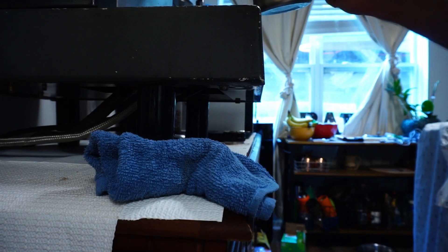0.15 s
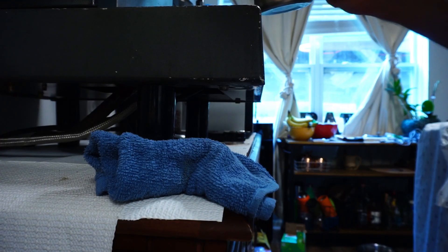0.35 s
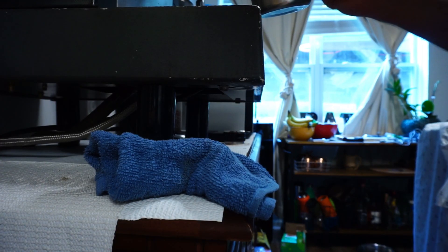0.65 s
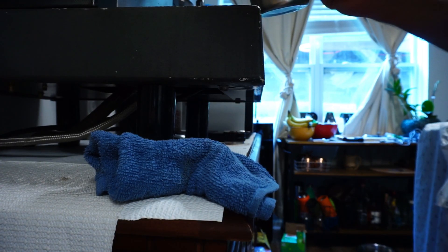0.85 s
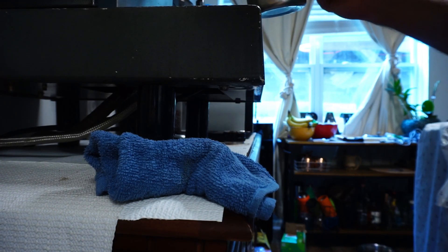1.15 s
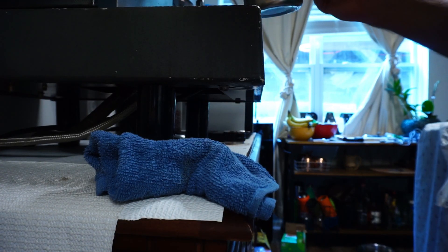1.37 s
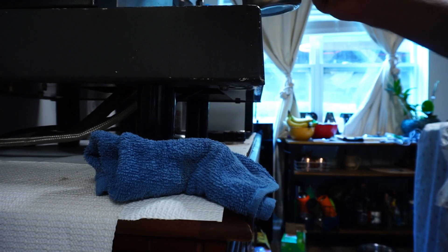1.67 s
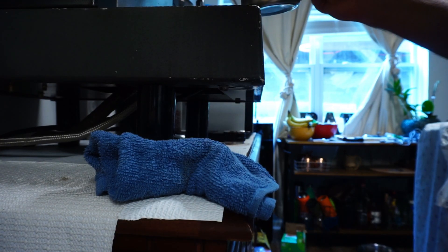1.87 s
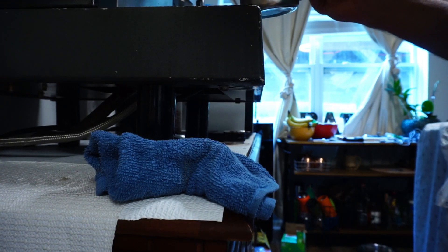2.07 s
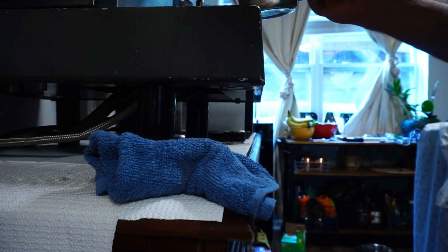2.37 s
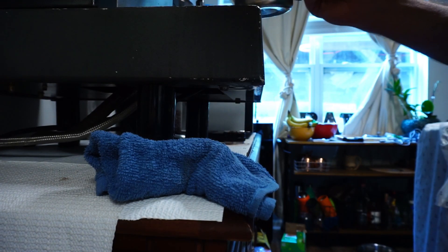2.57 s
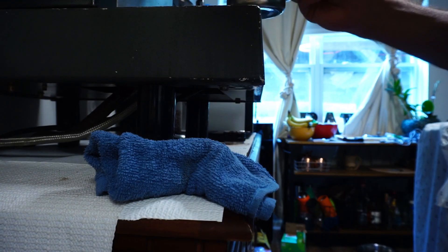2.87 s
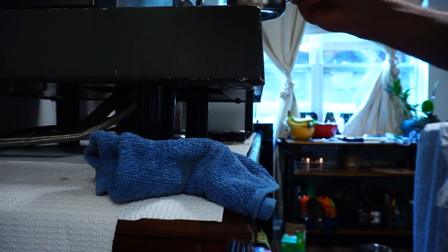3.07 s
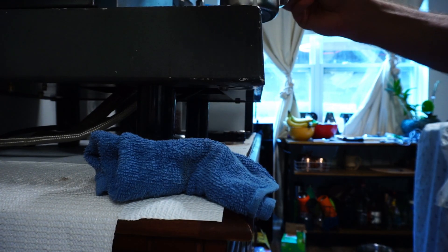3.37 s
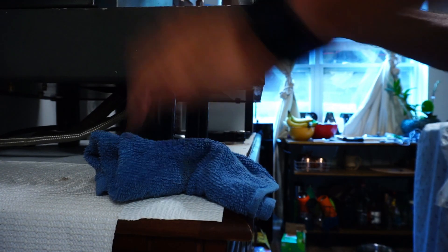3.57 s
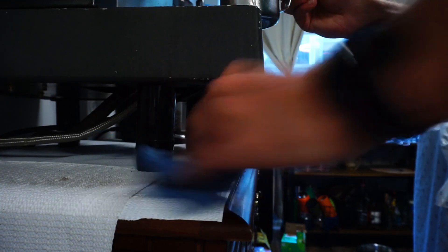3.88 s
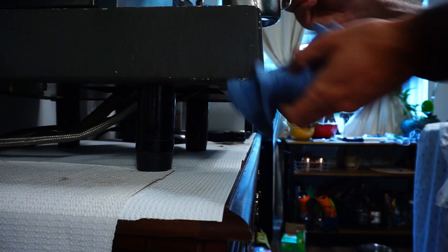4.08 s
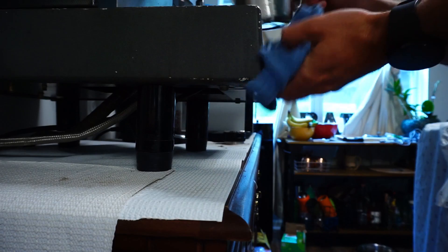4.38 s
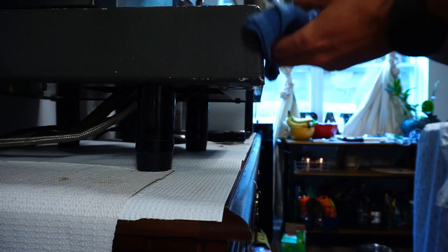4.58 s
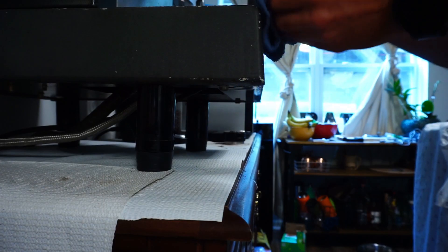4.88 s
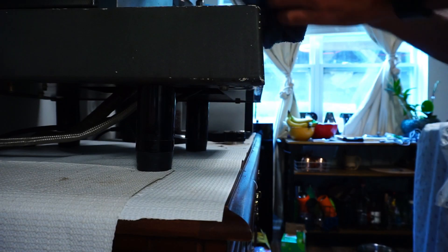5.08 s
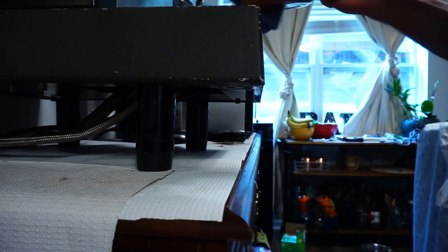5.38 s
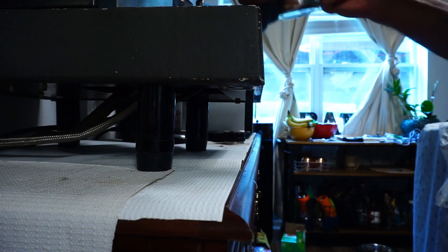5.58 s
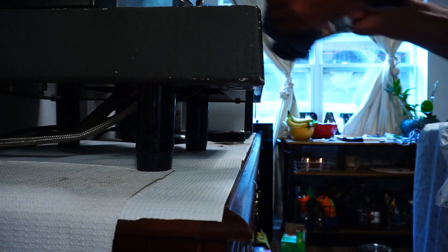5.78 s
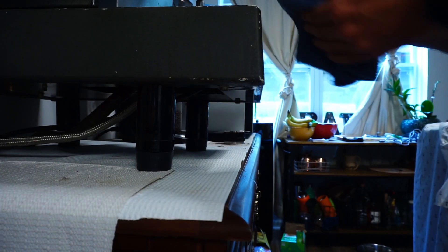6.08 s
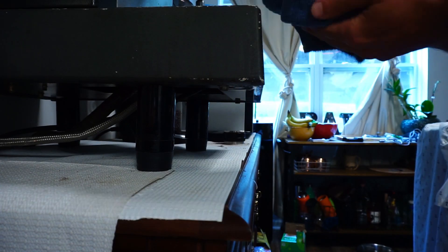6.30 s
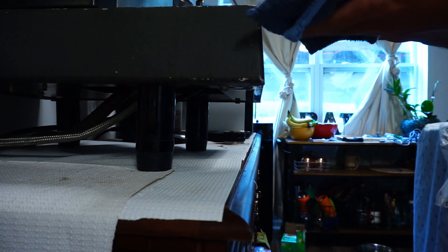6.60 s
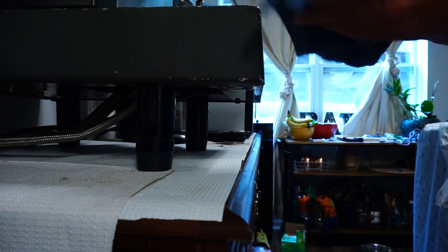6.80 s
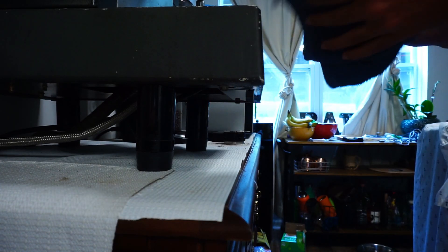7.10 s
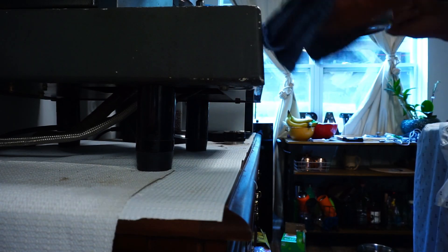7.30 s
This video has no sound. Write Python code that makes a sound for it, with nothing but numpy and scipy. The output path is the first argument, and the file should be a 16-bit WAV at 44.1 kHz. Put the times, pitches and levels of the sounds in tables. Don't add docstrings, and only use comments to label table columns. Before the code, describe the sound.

Heard close up in a small, quiet kitchen. From the start to about 1.4 s, a steam wand spits loud, bright, irregular crackling bursts into milk in a metal pitcher, over dense hiss whose resonances ring the pitcher walls. From 1.4 to 2.2 s it dulls and drops to softer churning and low rumble with faint whistles. Around 2.2 to 2.5 s the froth heaves up again in spurts, then gurgles and soft low thumps lead to last weaker gulps near 3 s. At 3.15 s the valve gives a short high squeal, steam cuts off and residue sighs away. A knob clicks at 3.6 s. Cloth rubs begin about 3.8 s, with knocks and rattles near 3.9-4.0, a strong metal knock at 4.4, a clink at 4.8, and a hard wipe with clustered buzzing knocks at 5.7 s. Afterwards only faint room tone, tiny squeaks at 6.8 and a soft knock and shuffle at 7.2 s.

```python
import sys
import numpy as np
from scipy import signal
from scipy.fft import rfft, irfft, next_fast_len
from scipy.io import wavfile
from scipy.ndimage import uniform_filter1d

SR = 44100
rng = np.random.default_rng(int(sys.argv[2]) if len(sys.argv) > 2 else 0)


def bounce(signal):
    frames = np.transpose(np.atleast_2d(signal))
    limited = np.clip(frames, -1, 1)
    pcm = np.round(limited * 32767).astype(np.int16)
    wavfile.write(sys.argv[1], SR, pcm)


def undo_db(level):
    steps = np.asarray(level, float) / 20
    return 10 ** steps


N = 328545

# [f/Hz, level/dB per Hz]
JET_COLOUR = [(2650, -36), (4500, -13), (7850, -0.5), (8680, -3), (10600, -4.5), (11500, -3), (14000, -5.5),
              (15100, 1), (16000, -18)]
TEAR_COLOUR = [(1180, -60.5), (2000, -28), (2270, -33.5), (2950, 3), (3260, 3.5), (4170, 4.5), (5160, 2),
               (6500, -5), (8450, -20.5), (14300, -120)]
BODY_COLOUR = [(410, -29), (700, -7.5), (1040, -8.5), (1390, -2), (1840, -5.5), (2060, -4), (2280, -7),
               (2650, -6), (3510, -25.5), (5940, -120)]
RUMBLE_COLOUR = [(47, -49.5), (80, -41), (140, -2.5), (210, -3), (330, -0.5), (450, 2), (610, -2),
                 (760, 0.5), (1170, 0.5), (1980, -120)]
# [t/s, level/dB]
JET_FLOW = [(0, -14), (.06, -22), (.15, -17), (.19, -30), (.4, -30), (.5, -30.5), (.54, -21.5), (.62, -20),
            (.8, -23), (.97, -13.5), (1.01, -23), (1.24, -23.5), (1.46, -35.5), (1.62, -42), (2.05, -39),
            (2.55, -36), (3.1, -33.5), (3.17, -47)]
# [t/s, churn level/dB, tip depth as level added to body and rumble/dB]
CHURN = [(0, -27, -4), (.2, -25.5, -4), (.5, -24.5, -7.5), (.8, -23, -6.5), (1.0, -28.5, -4),
         (1.151, -25, -2), (1.4, -25.5, -4), (1.47, -33.5, 1), (1.62, -32.5, 1), (1.79, -43, 2),
         (2.1, -42, -6), (2.3, -45.5, -3.5), (2.56, -36, -2.5), (2.68, -43, 2), (2.82, -35, 0.5),
         (3.05, -34, 2.5), (3.16, -31.5, 5), (3.22, -51.5, 26)]
# [t/s, lift/dB, half width/s, share felt in the body]
SURGES = [(.15, 1, 0.016, 4.7), (.54, 2.5, 0.0084, 1.5), (0.584, -10, 0.0081, 9.2),
          (.63, -5.5, 0.035, 0.67), (.75, 1.5, 0.011, 1.2), (1.11, 0, 0.023, 3), (1.201, 6, 0.018, 1.06),
          (2.109, 0.5, 0.058, 14), (2.25, 17, 0.06, 0.86), (2.41, 7.5, 0.074, 1.96),
          (2.47, -7.5, 0.047, 1.27), (2.51, 7, 0.014, 0.9), (2.97, 5.5, 0.017, 1.4), (3.09, 4, 0.032, 0.41)]
# [f/Hz, width/Hz, lift/dB]
STEAM_MODES = [(1240, 45, 6), (1415, 45, 8), (1575, 30, 6), (1700, 50, 5), (2135, 35, 8), (2760, 150, 4),
               (3310, 160, 2), (3760, 120, 5), (4200, 200, 3), (7760, 45, 4), (8490, 60, 8),
               (9500, 150, 5), (10480, 75, 5), (12550, 300, 5),
               (3040, 110, -10), (7930, 200, -9), (14100, 400, -4), (15690, 150, 12),
               (446.5, 32, 7.5), (600.6, 34, 8.5), (750, 40, -5), (860, 70, 2.5), (1040, 36, -1),
               (1134, 30, 3.5), (1360, 16, -3), (1706, 25, -3.5), (1820, 35, 1.5), (1892, 50, -10),
               (1916, 56, 6.5), (2230, 50, -3.5), (340, 80, -2.5)]
# [t/s, peak level/dB,
# length/s, tilt/dB per octave, loudest f/Hz]
SPURTS = [(.0024, -0.5, 0.028, 4.5, 12200), (0.056, -7.5, 0.077, 7, 12240), (0.103, -12.5, 0.037, 13, 9760),
          (0.14, -5, 0.035, 3, 13300), (.2312, -16, .005, -2.5, 9530), (0.253, -18.5, 0.0082, 2, 13000),
          (0.333, -17, 0.0092, -5, 11320), (0.388, -17.5, 0.008, -7, 9000), (0.409, -9.5, 0.013, 1, 10240),
          (0.449, -5.5, 0.0099, 0.5, 11300), (0.473, -3, .01, 3.5, 13060),
          (0.486, -9.5, 0.011, -2.5, 14300), (0.536, -16, 0.021, 0.5, 8740), (0.5506, 2, 0.034, 4.5, 14000),
          (.594, -2, 0.049, 5.5, 12500), (0.646, -4, 0.036, 5, 12660), (0.755, -9, 0.016, 3.5, 13440),
          (.779, 0, 0.019, 7, 13230), (0.813, -7.5, 0.0076, 4.5, 8000), (0.821, 0, 0.0069, 0, 12200),
          (0.846, -1, 0.018, 6.5, 8960), (0.9157, 1, .007, 4, 12370), (0.921, -1, 0.029, 2, 12380),
          (0.95, -1.5, 0.038, 7.5, 9220), (1.084, -1, 0.016, 6.5, 9600), (1.1, -1, 0.03, 6, 12320),
          (1.194, -10, 0.025, -0.5, 9520), (1.25, -18, .008, -3, 7000), (1.292, -4, .008, -2, 6950),
          (1.313, -4.5, 0.035, 1.5, 9500), (1.372, -12, 0.011, 5.5, 11900),
          (2.2286, -9.5, 0.012, -6.5, 4420), (2.258, -10, .008, -3, 4700), (2.279, -12, .005, 1, 8230),
          (2.292, -4.5, 0.0088, 0, 12430), (2.389, -15, 0.014, -8, 3870),
          (2.939, -13, .016, -4.5, 5400), (2.957, -14.5, .022, -10.5, 6720),
               (2.98, -17, .01, -10, 5970), (3.041, -20, 0.0046, -13.5, 3300),
               (3.105, -15, .012, -10.5, 8800), (3.121, -14.5, .014, -2, 5500),
               (3.142, -13, 0.021, -12.5, 2700), (3.176, -22, .008, -17, 1700)]
# [t/s, peak level/dB, length/s, loudest f/Hz]
SLURPS = [(1.1745, -15, 0.032, 4250), (1.297, -14, 0.01, 3830), (1.343, -10.5, 0.0078, 4100),
          (1.381, -13.5, .01, 3860), (1.396, -19, 0.0096, 3300), (1.416, -15.5, 0.011, 4070),
          (1.517, -24.5, 0.0068, 3740), (1.555, -33, .006, 3810), (1.567, -19, 0.0077, 3790),
          (1.599, -29.5, 0.0075, 2300), (1.65, -35, 0.011, 3730), (1.697, -25, .01, 4120),
          (2.423, -19.5, 0.0098, 3750), (2.472, -19.5, 0.012, 3300), (2.495, -18.5, 0.012, 3400),
          (2.778, -21, 0.016, 4000), (0.28, -22.5, .012, 4000), (0.414, -18.5, 0.0068, 4400),
          (0.681, -16.5, 0.016, 4000), (0.741, -15, 0.017, 3710), (1.201, -13, .004, 3300),
          (1.21, -14, 0.0036, 3600), (1.26, -19, 0.0045, 3900), (1.726, -27.5, 0.0046, 6470)]
# [f/Hz, level/dB per Hz]
SPURT_COLOUR = [(100, -110), (1500, -34), (3000, -11.5), (4200, -12), (6000, -7.5), (9500, -4.5),
                (12500, -8), (15500, -5.5), (16000, -15.5)]
# [f/Hz, level/dB, t60/s]
SQUEAL_MODES = [(3250, -20, .15), (3310, -23, .15), (6530, -30, .13), (9750, -31, .11), (2650, -29, .07),
                (3265, -38, .45), (3320, -43, .4), (6540, -52, .3)]
# [start t/s, end t/s, f/Hz, width/Hz,
# level/dB]
FUZZY_TONES = [(1.4, 3.2, 8500, 200, -52.5), (1.4, 3.2, 11300, 550, -50.5), (1.4, 3.2, 15000, 600, -53),
               (2.55, 3.1, 4820, 300, -44), (1.75, 2.65, 3280, 200, -52), (2.4, 3.3, 1500, 450, -43),
               (2.7, 3.2, 6570, 150, -50), (.1, .2, 7770, 150, -32), (.02, .2, 250, 90, -45),
               (3.2, 3.55, 170, 90, -55), (2.82, 3.0, 4820, 200, -43),
               (0.17, 0.52, 1100, 720, -39), (0.81, 1, 450, 200, -46), (2.06, 2.16, 380, 190, -48),
           (2.3, 2.45, 330, 54, -53), (2.72, 2.84, 190, 79, -54), (2.15, 2.4, 120, 100, -57.5),
           (3.08, 3.3, 1650, 350, -41), (3.55, 3.75, 140, 110, -56.5), (1.8, 2, 1200, 300, -48),
           (3.25, 3.5, 250, 110, -55), (.85, 1.1, 200, 80, -58), (2.55, 3, 306, 82, -54)]
# [t/s, peak level/dB, length/s]
THUMPS = [(.72, -47, 0.087), (1.15, -49, 0.089), (1.27, -43, .1), (1.34, -43, 0.061), (1.41, -48, 0.26),
          (2.09, -56, 0.054), (2.49, -40, 0.062), (2.955, -40, 0.055), (3.06, -39, 0.089),
          (3.295, -36.5, 0.067), (3.35, -38, 0.06), (3.475, -44.5, 0.067)]
# [t/s, peak level/dB, main f/Hz, rattle level/dB, counter boom level/dB]
KNOCKS = [(3.922, -34, 670, 6.5, -1), (3.94, -34.5, 404, -8.5, -21), (3.981, -38.5, 408, -8.5, -15.5),
          (4.037, -40, 860, 10, 2), (4.414, -19, 672, -2, -34), (4.429, -24.5, 398, 0, -17),
          (4.7633, -34.5, 706, 6.5, -4.5), (5.239, -49, 368, 7, -6), (5.535, -43.5, 740, 5, -4),
          (5.563, -49, 636, 5, -15), (5.599, -54, 610, 13, -15), (5.6921, -20.5, 1525, -11.5, -24.5),
          (5.704, -21.5, 1557, -10, -23), (5.731, -28, 1400, -2.5, -16), (5.771, -25.5, 700, -7.5, -13),
          (5.786, -40.5, 759, -10, 0), (7.199, -39.5, 382, -4, -8)]
# [f/Hz, level/dB per Hz]
RATTLE_COLOUR = [(71, -37), (120, 2.5), (412, -3), (711, -4), (971, -11.5), (1100, -7.5), (1290, -9),
                 (1580, -17), (1790, -21), (5000, -28), (6500, -60), (11000, -120)]
BOOM_COLOUR = [(110, -29.5), (160, -8.5), (240, 4.5), (290, 0), (400, -13), (650, -16.5), (1000, -42)]
# [t/s, peak level/dB]
CRACK = (6700, 0.044, 2.9)
CRACKS = [(3.925, -47), (4.0378, -33.5), (4.051, -37.5), (4.413, -36.5), (4.765, -32), (5.694, -42),
          (5.7697, -30), (5.8148, -41.5)]
PING = (1900, 0.14, 33)
PINGS = [(3.924, -45), (4.037, -40.5), (4.4134, -41.5), (4.43, -56), (5.5618, -48.5), (5.6007, -47.5),
         (5.692, -37.5), (5.718, -44.5)]
SCRAPE = (4200, 0.24, 32)
SCRAPES = [(5.7135, -39.5), (5.7394, -52), (5.77, -45)]
SWISH = (11000, 0.093, 8.9)
SWISHES = [(4.439, -41), (4.7646, -69), (5.2594, -50), (5.3248, -47), (5.7194, -44)]
SQUEAK = (3700, 0.097, 61)
SQUEAKS = [(6.8129, -48), (6.8294, -50), (6.8594, -55)]
SHUFFLE = (490, 0.18, 13)
SHUFFLES = [(7.23, -43.5), (7.327, -47.5)]
# [t/s, peak level/dB, centre f/Hz, t60/s, narrowness/dB per octave squared]
ODD_TICKS = [
    (3.5748, -40, 9000, 0.006, 4),
    (3.79, -49, 7500, 0.027, 3),
    (4.4945, -37, 2980, 0.037, 15),
    (4.766, -42, 235, 0.86, 150),
    (5.772, -38, 280, 0.46, 58),
    (5.745, -42, 273, .3, 60),
]
VENT = [
    (3.19, -33.5, 1400, 0.58, 8.5),
    (3.175, -38, 7500, .4, 4),
]
# [t/s, peak level/dB, centre f/Hz, t60/s]
BUZZES = [(3.926, -37.5, 394, 0.2), (3.926, -36.5, 730, 0.11), (4.04, -45, 1750, 0.13),
          (4.416, -35, 1170, .2), (4.44, -32, 410, 0.27), (4.43, -35, 687, 0.22), (4.418, -43, 1900, .18),
          (4.418, -45, 2350, .15), (4.495, -44, 1580, .05), (5.716, -34, 1550, 0.13),
          (5.695, -35, 2270, 0.18), (5.72, -35.5, 800, .2), (5.735, -35, 1384, 0.23),
          (5.745, -39.5, 1640, .25), (5.772, -29.5, 663, 0.091), (5.79, -41.5, 1554, 0.18),
          (5.535, -46, 1350, .05), (5.56, -44, 1450, .15)]
# [t/s, f/Hz, level/dB, t60/s]
KNOB_SNAP = (3.5748, 7200, -27, .004)
# [f/Hz, level/dB, t60/s]
CLINK_MODES = [(1475, -45, .09), (1500, -50, .12), (3450, -43, .045), (4565, -42, .02), (5512, -44, .025),
               (6800, -41, .015), (7950, -47, .015)]
# [peak t/s, level/dB, fade/dB per s]
WIPES = [
    (3.84, -53, 4.5),
    (3.94, -50.5, 70),
    (4.06, -52, 32),
    (4.46, -47.5, 20),
    (4.8, -51.5, 30),
    (5.3, -55, 37),
    (5.55, -50.5, 48),
    (5.711, -38.5, 79),
    (5.9, -55.5, 25),
    (7.22, -64, 24.5),
]
# [f/Hz, level/dB per Hz]
CLOTH_COLOUR = [(350, -53), (600, 1.5), (1070, -4), (1330, -5), (2270, -11.5), (3830, -14.5),
                (10000, -10.5), (16000, -9)]
# [f/Hz, level/dB per Hz]
ROOM_COLOUR = [(12, -40.5), (20, -13), (65, -7), (187, -8), (228, -8.5), (301, -8.5), (471, -10),
               (573, -17.5), (737, -13), (1220, -18), (1610, -19), (2590, -22), (16000, -30.5)]
# [f/Hz, likeness]
ROOM_LIKENESS = [(60, .9), (130, .75), (290, .25), (640, -.2), (1410, -.3), (3100, -.2), (7300, -.1),
                 (7700, .95), (16000, .96)]
# [f/Hz, level/dB]
FRIDGE_HUM = [(59, -63), (475, -66)]
# [f/Hz, t60/s]
KITCHEN_T60 = [(200, 0.8), (1000, 0.32), (4000, 0.29), (12000, 0.19)]
# [f/Hz, phase/rad]
LEFT_LEADS = [(100, 0.61), (900, -1.21), (4300, -0.61), (6500, -1.25), (7800, 0), (16000, 0.19)]
# [f/Hz, level/dB]
PORT_WIDTH = [(60, -10), (300, -8), (1000, -11.5), (6000, 1), (9000, 2.5), (16000, 0.5)]
# [f/Hz, side over mid level/dB]
NARROW_UNDER = [(2200, -60), (2300, -11), (4400, -11), (4500, -22), (7400, -20), (7600, -8), (16000, -8)]


def evened(x):
    return x / np.sqrt(np.mean(x ** 2) + 1e-20)


def read(points, hz):
    f, value = np.transpose(points)
    return np.interp(np.log(hz + 1), np.log(f + 1), value)


def add(mix, s, sound):
    part = mix[max(round(s * SR), 0):][:len(sound)]
    part += sound[:len(part)]


def colour(x, db_of):
    return irfft(rfft(x) * undo_db(db_of(np.fft.rfftfreq(len(x), 1 / SR))), len(x))


def spit(size, grain_s, depth_db):
    grain = max(int(grain_s * SR), 1)
    jumps = evened(uniform_filter1d(rng.standard_normal(size), grain))
    return evened(rng.standard_normal(size) * undo_db(depth_db * jumps))


def patchy(x, depth_db):
    z = signal.stft(x, nperseg=512)[2]
    patches = uniform_filter1d(rng.standard_normal(z.shape), size=6, axis=0)
    patches = evened(uniform_filter1d(patches, size=8, axis=1))
    return evened(signal.istft(z * undo_db(depth_db * patches), nperseg=512)[1][:len(x)])


def walls(hz):
    modes = STEAM_MODES
    return sum(db / (1 + (2 * (hz - mode_hz) / width) ** 2) for mode_hz, width, db in modes)


def ring(hz, db, t60, t):
    return undo_db(db - 60 * t / t60) * np.sin(2 * np.pi * hz * t)


def steam():
    t, out = np.arange(N) / SR, np.zeros(N)
    s, churn_db, depth_db = np.transpose(CHURN)
    churn_db, depth_db = np.interp(t, s, churn_db), np.interp(t, s, depth_db)
    tear_db, body_db = churn_db.copy(), churn_db.copy()
    for at, lift_db, half_s, share in SURGES:
        heave_db = lift_db * np.maximum(1 - abs(t - at) / (2 * half_s), 0)
        tear_db += heave_db
        body_db += heave_db * share

    shut_s, drop_db, drain_db_per_s = 3.192, 14, 59
    since = t - shut_s
    shut_db = (since > 0) * (drop_db * np.minimum(since / 0.0092, 1) + drain_db_per_s * since)

    jet_db = np.interp(t, *np.transpose(JET_FLOW))
    rumble_db = -22 + 0.58 * (0.78 * churn_db + 0.28 * body_db) + 0.94 * depth_db
    layers = [  # colour, level dB, grain s, grain dB, patch dB
        (JET_COLOUR, jet_db - .5 * shut_db, .003, 2.4, 2.),
        (TEAR_COLOUR, tear_db - .5 * shut_db, .004, 2.6, 1.1),
        (BODY_COLOUR, body_db + depth_db - 1.3 * shut_db, .008, 1.8, 1.3),
        (RUMBLE_COLOUR, rumble_db - 0.92 * shut_db, .02, 1.8, 1.3)]
    for shape, level_db, grain_s, grain_db, patch_db in layers:
        hiss = colour(spit(N, grain_s, grain_db), lambda hz: read(shape, hz) + walls(hz))
        out += patchy(hiss, patch_db) * undo_db(level_db - 3.0)
    return out


def spurts():
    out, t = np.zeros(N), np.arange(8192) / SR
    slurp_tilt_db, focus_db, focus_octaves = -11, 7.5, 0.17
    slurps = [(s, db, length, slurp_tilt_db, hz) for s, db, length, hz in SLURPS]
    for s, db, length, tilt_db, hz in SPURTS + slurps:
        def gulp_db(f):
            tilt = np.clip(tilt_db, -15, 12) * np.log2((f + 500) / 9000)
            focus = focus_db * np.exp(-(np.log2((f + 1) / hz) / focus_octaves) ** 2)
            return read(SPURT_COLOUR, f) + 0.333 * walls(f) + tilt + focus

        burst = patchy(colour(spit(len(t), 0.0012, 1.85), gulp_db), 3.44)
        fall_s = 0.0073 + 0.16 * length
        shape = np.minimum(t / 0.0015, 1) * np.exp(-np.maximum(t - length, 0) / fall_s)
        add(out, s, undo_db(db - 13.0) * burst * shape)
    return out


def valve_squeal():
    out, t = np.zeros(N), np.arange(20000) / SR
    rise_s = .005
    add(out, 3.143, sum(ring(*mode, t) for mode in SQUEAL_MODES) * np.minimum(t / rise_s, 1))
    return out


def resonate(x, hz, width):
    return evened(colour(x, lambda f: -20 * np.log10(1 + (2 * (f - hz) / width) ** 2)))


def whistles():
    out = np.zeros(N)
    for start, end, hz, width, db in FUZZY_TONES:
        size = 256 * int((end - start) * SR / 256)
        tone = resonate(spit(SR * 2, .03, 1.8), hz, width)[:size]
        add(out, start, undo_db(db) * tone * signal.windows.tukey(size, .45))
    return out


def thumps():
    out = np.zeros(N)
    start_hz, sag = 165, .2
    for s, db, length in THUMPS:
        t = np.arange(0, length, 1 / SR)
        swell = np.sin(np.pi * t / length) ** 2
        add(out, s, undo_db(db) * swell * np.sin(2 * np.pi * start_hz * t * (1 - sag * t / length / 2)))
    return out


def knocks():
    out, t = np.zeros(N), np.arange(16000) / SR
    boom_t60_s, boom_rise_s, rise_s = 0.5, 0.0041, .0013
    for s, db, hz, rattle_db, boom_db in KNOCKS:
        t60 = 0.087 * (700 / hz) ** .45
        note = ring(hz * .985, -7, t60, t) + ring(hz * 1.03, -8.5, 0.98 * t60, t)
        rattle = evened(colour(rng.standard_normal(len(t)), lambda f: read(RATTLE_COLOUR, f)))
        rattle *= undo_db(rattle_db - 11.5 - 45 * t / t60)
        boom = evened(colour(rng.standard_normal(len(t)), lambda f: read(BOOM_COLOUR, f)))
        boom *= undo_db(boom_db - 8.5 - 60 * t / boom_t60_s) * np.minimum(t / boom_rise_s, 1)
        add(out, s, undo_db(db) * (note + rattle + boom) * np.minimum(t / rise_s, 1))
    return out


def ticks():
    out, t = np.zeros(N), np.arange(16000) / SR
    kinds = [(CRACK, CRACKS), (PING, PINGS), (SCRAPE, SCRAPES),
             (SWISH, SWISHES), (SQUEAK, SQUEAKS), (SHUFFLE, SHUFFLES)]
    events = ODD_TICKS + VENT
    events = events + [(*row, 220) for row in BUZZES]
    events = events + [(*row, *kind) for kind, rows in kinds for row in rows]
    for s, db, hz, t60, narrow_db in events:
        noise = rng.standard_normal(len(t))
        tick = evened(colour(noise, lambda f: -max(narrow_db, 1) * np.log2((f + 1) / hz) ** 2))
        add(out, s, tick * undo_db(db - 60 * t / t60 - 60 * min(t60, .1)))
    add(out, KNOB_SNAP[0], ring(*KNOB_SNAP[1:], t))
    add(out, 4.7638, sum(ring(*mode, t) for mode in CLINK_MODES))
    return out


def cloth():
    t = np.arange(N) / SR
    rise_db_per_s, held_db, pickup_s = 384, -61, 3.5
    strokes = [db - np.maximum(rise_db_per_s * (s - t), fade_db * (t - s)) for s, db, fade_db in WIPES]
    rub = patchy(colour(spit(N, 0.012, 1.7), lambda hz: read(CLOTH_COLOUR, hz)), 0.73)
    held = undo_db(held_db) * np.clip((t - pickup_s) / 0.28, 0, 1)
    return rub * np.maximum(undo_db(np.max(strokes, axis=0)), held)


def kitchen(x):
    taps = np.zeros((2, 22050))
    at = np.arange(100, 22000, 20) + rng.integers(0, 20, (2, 1095))
    np.put_along_axis(taps, at, rng.choice([-1., 1.], at.shape), 1)
    hz, t, z = signal.stft(taps, SR, nperseg=256)
    decay = undo_db(-60 * t / read(KITCHEN_T60, hz)[:, None])
    tail = signal.istft(z * decay, SR, nperseg=256)[1]
    return signal.fftconvolve(x[None], tail / np.linalg.norm(tail[0]), axes=1)[:, :N]


def placed(x, left_db, wet_db):
    size = next_fast_len(N + 8192)
    lead = np.exp(1j * read(LEFT_LEADS, np.fft.rfftfreq(size, 1 / SR)))
    left = irfft(rfft(x, size) * lead, size)[:N]
    wet = undo_db(wet_db) * kitchen(x)
    mid = wet.mean(0)
    side = np.pad(wet[0] - wet[1], (0, size - N)) / 2
    side = colour(side, lambda hz: read(PORT_WIDTH, hz))[:N]
    return (np.array([left, x]) + [mid + side, mid - side]) * undo_db([[left_db / 2], [-left_db / 2]])


def room_tone():
    hz, t = np.fft.rfftfreq(N, 1 / SR), np.arange(N) / SR
    same = np.clip(read(ROOM_LIKENESS, hz), -.99, .99)
    a, b = rfft(rng.standard_normal((2, N)))
    pair = np.array([a, same * a + np.sqrt(1 - same ** 2) * b])
    air = evened(irfft(pair * undo_db(read(ROOM_COLOUR, hz)), N))
    hum = sum(undo_db(db) * np.sin(2 * np.pi * f * t) for f, db in FRIDGE_HUM)
    return undo_db(-54.5 + 1.5) * air + hum


def narrowed(x):
    mid_side = np.array([x[0] + x[1], x[0] - x[1]]) / 2
    hz, t, z = signal.stft(mid_side, SR, nperseg=2048)

    def cell(v):
        return np.repeat(v[..., ::32, :], 32, axis=-2)[..., :len(hz), :]

    power = abs(cell(uniform_filter1d(abs(z) ** 2, size=32, axis=1, origin=-16))) + 1e-30
    whim_db = 5 * cell(uniform_filter1d(rng.standard_normal(z[0].shape), size=3, axis=1))
    side_db = 10 * np.log10(power[1] / power[0])
    keep = side_db + whim_db > read(NARROW_UNDER, hz)[:, None]
    mid, side = signal.istft(np.array([z[0], z[1] * keep]), SR, nperseg=2048)[1][:, :N]
    return np.array([mid + side, mid - side])


def scene():
    wand = placed(steam() + spurts() + valve_squeal() + whistles(), 2.3, -4.5)
    wiping = placed(knocks() + ticks() + cloth(), 1.2, -8)
    loud_db = 10 * np.log10(abs(uniform_filter1d((wand ** 2).mean(0), size=9000)) + 1e-12)
    duck_db = .5 * np.maximum(loud_db + 30, 0)
    return wand + thumps() + wiping + room_tone() / undo_db(duck_db)


def band_limit(x):
    return signal.sosfilt(signal.butter(12, 16100, fs=SR, output="sos"), x)


def record(dry):
    edge = signal.firwin(1601, 15770, window=("kaiser", 9), fs=SR)
    mix = signal.oaconvolve(narrowed(np.clip(dry, -1, 1)), edge[None], "same")
    return band_limit(mix)


dry = scene()
out = record(dry)
bounce(out)
```